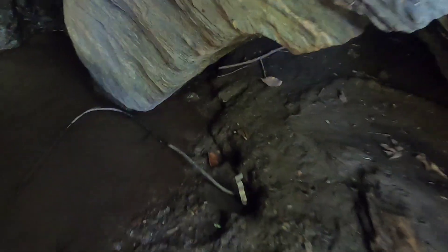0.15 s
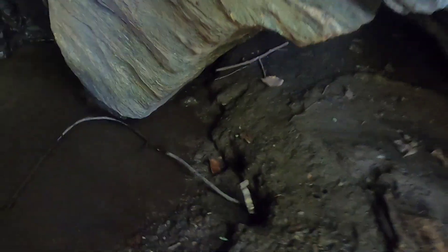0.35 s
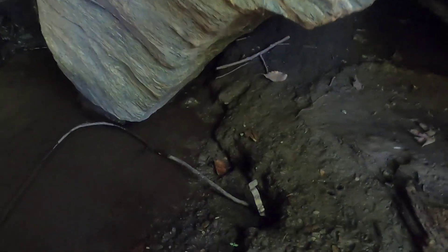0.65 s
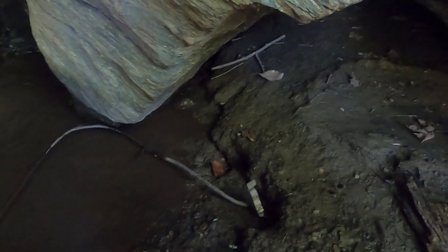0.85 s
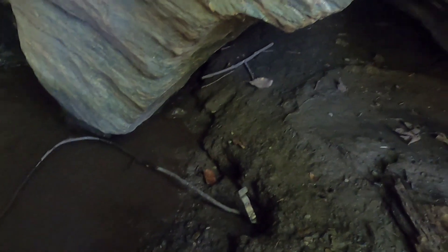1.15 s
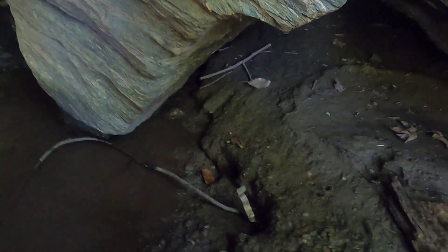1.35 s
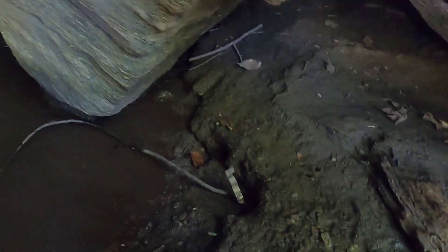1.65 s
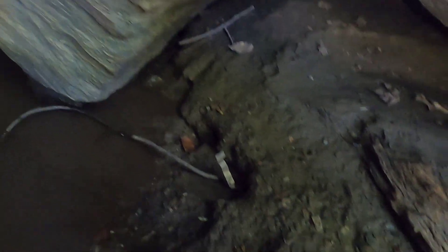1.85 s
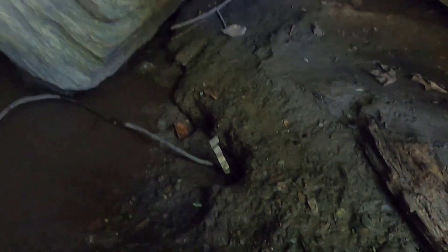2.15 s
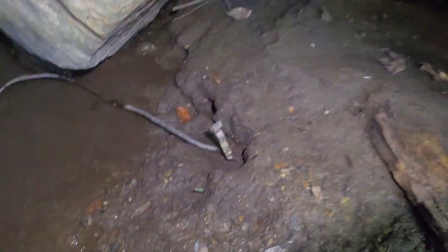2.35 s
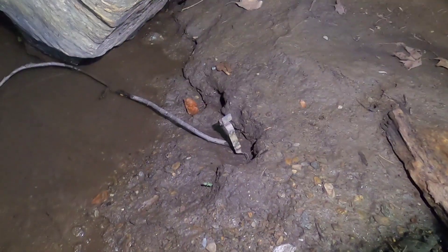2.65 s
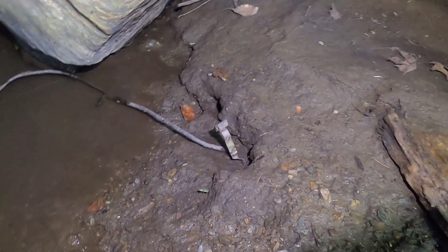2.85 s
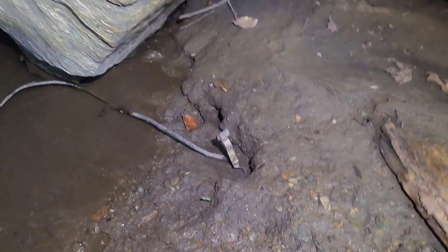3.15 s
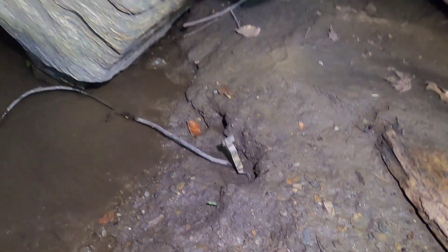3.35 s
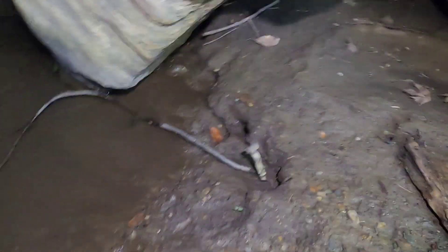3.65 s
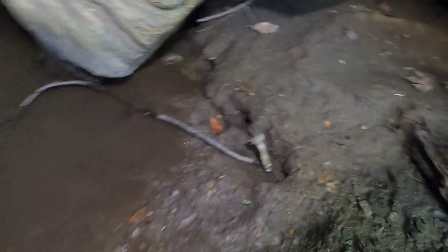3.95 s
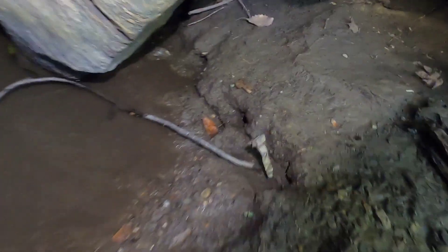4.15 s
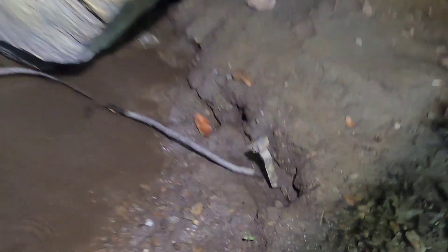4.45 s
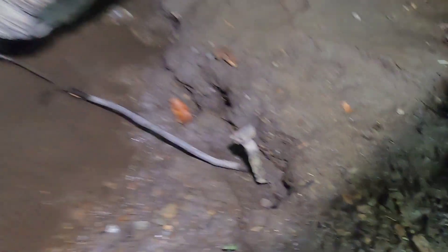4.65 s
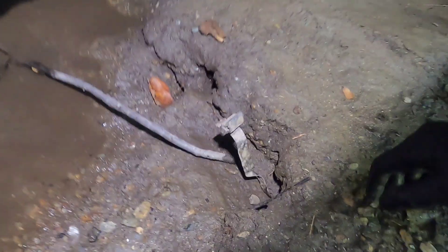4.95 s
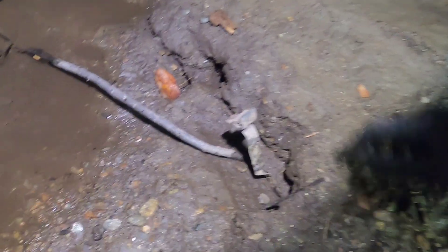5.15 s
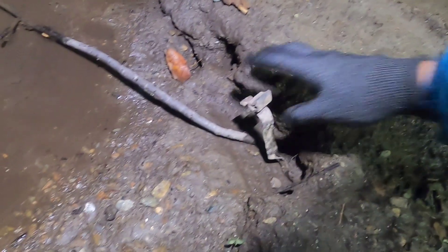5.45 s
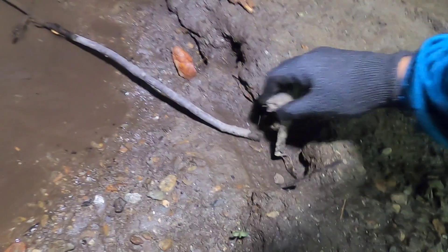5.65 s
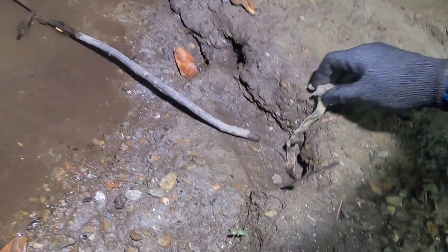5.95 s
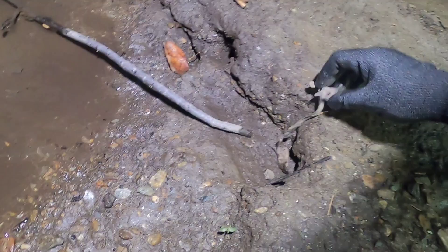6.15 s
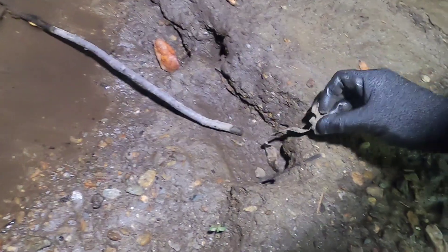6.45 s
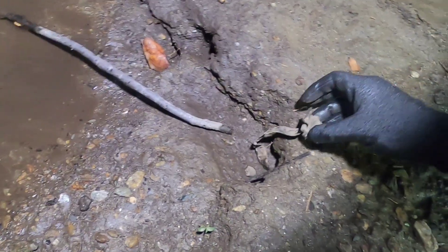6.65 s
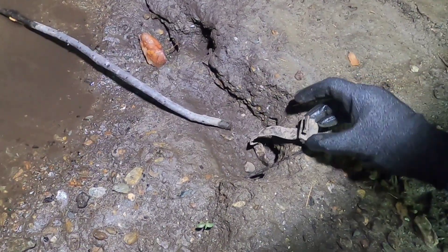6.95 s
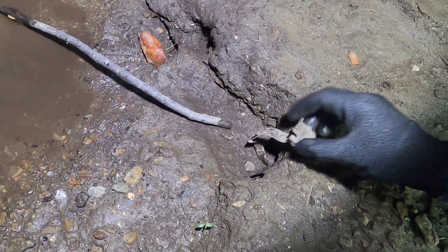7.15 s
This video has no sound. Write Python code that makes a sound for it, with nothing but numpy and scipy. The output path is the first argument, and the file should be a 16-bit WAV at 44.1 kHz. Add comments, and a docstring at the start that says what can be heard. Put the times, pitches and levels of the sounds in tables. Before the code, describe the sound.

Water rushes continuously in a low, rocky cave, a patchy hiss leaning left, with swarms of gurgling bubbles, fine spray, quick droplet ticks and a faint hum from hollows. At 0 s stones clatter hard underfoot, a sharp clack with a short ring; softer treads and hollow taps follow at about 0.2, 0.4 and 0.6 s, with a little crunching grit. From 0.7 to 3.6 s the stream dominates, with single rising plops, a faint tread near 1.5 s and small splashes near 1.4, 1.9 and 2.9 s. At 3.7 s a splash and deep camera bumps lead to a gravelly heel scuff at 3.9 s, then a second loud stone clatter at 4.0 s, trailing small clicks until 4.2 s. A low jolt and dull faint step follow by 4.7 s. Water carries on to 7.3 s, slightly softer and more central, with plops and light slaps around 6 s.

```python
"""A stream rushes to the left in a low rock cave: patchy hiss with bubble swarms, spray and humming hollows.
Droplets tick and single bubbles plop as short sines; splashes slap the rocks as bursts of filtered noise.
The person holding the camera shifts their footing on wet gravel: treads, hollow taps, a heel scuff and two
hard clatters of stones, at the start and near 4 s, made of pressed pebbles, clacks and ground resonances.
The hand-held camera rumbles as it moves: deep noise with a few jolts."""
import sys
import numpy as np
from scipy import signal
from scipy.fft import rfft, irfft, next_fast_len
from scipy.io import wavfile
from scipy.ndimage import uniform_filter1d, map_coordinates

SR = 44100
rng = np.random.default_rng(int(sys.argv[2]) if len(sys.argv) > 2 else 0)


def transcribe(u):
    """Save the signal u as a 16-bit wav file named by the first command-line argument.

    u: samples, shape (n,) or (channels, n), limited to [-1, 1]; the rate is SR.
    q: integer samples, one column per channel.
    """
    v = np.clip(np.atleast_2d(u).T, -1, 1)
    q = np.round(v * 32767).astype(np.int16)
    wavfile.write(sys.argv[1], SR, q)


N = 322371
TIME = np.arange(N) / SR

# Every balance is left minus right, in dB: positive leans left.
# where the stream lies as the camera turns: time_s, balance_db
STREAM_BALANCE = [(0, -3), (3.4, -1), (4.3, -2.5), (5.2, 0), (7.3, -0.5)]
# the stream grows fainter overall as the camera bends to the bank: time_s, base level_db
STREAM_LEVEL = [(0, -36.5), (.8, -37.5), (2.1, -37.5), (2.7, -38.5), (4.0, -37), (5.1, -39.5), (7.3, -39)]
# colour of the rush at the left ear, also weighting the bubbles by pitch: freq_hz, relative level_db
RUSH_COLOUR_LEFT = [(60, -23), (200, -12), (400, -16.5), (650, -9), (850, -9), (950, -6), (2200, 0),
                    (4200, 1), (6000, -4), (7400, -5), (8300, -17), (10000, -30), (15500, -50)]
# resonances of the stony ground under the boot: freq_hz, width_hz, relative level_db
GROUND_MODES = [(243, 26, -2.5), (341, 20, 0), (473, 20, -3.5), (585, 32, -0.5), (707, 33, -2),
                (1066, 65, -1), (1640, 40, -6)]
# colour of gravel scraping and cracking: freq_hz, relative level_db
SCRAPE_COLOUR = [(60, -14), (400, -16), (1300, -15), (4000, -22), (8000, -39), (15000, -60)]


def amp(db):
    """Decibels to gain."""
    return 10 ** (np.asarray(db) / 20)


def unit(x):
    """Scaled to rms 1."""
    return x / np.sqrt(np.mean(x ** 2) + 1e-20)


def fade(t, t60):
    """Exponential decay that falls 60 dB in t60 seconds."""
    return amp(-60 * t / t60)


def along(points, hz):
    """Curve of (freq_hz, value) points read on a log frequency axis."""
    f, v = np.transpose(points)
    return np.interp(np.log(hz + 1), np.log(f + 1), v)


def over_time(rows):
    """Curve of (time_s, value) points read at every sample."""
    s, v = np.transpose(rows)
    return np.interp(TIME, s, v)


def wobble(rate):
    """A smooth random curve with rate knots a second."""
    knots = rng.standard_normal(int(N * rate / SR) + 4)
    return map_coordinates(knots, [TIME * rate], mode="nearest")


def filtered(x, response):
    """x shaped by a complex response of frequency, with padding against wrap-around."""
    size = x.shape[-1]
    m = next_fast_len(size + 8192)
    return irfft(rfft(x, m) * response(np.fft.rfftfreq(m, 1 / SR)), m)[..., :size]


def resonances(modes, f):
    """Causal response of (freq_hz, width_hz, level_db) modes, with alternating signs."""
    total = 0
    for k, (centre, width, db) in enumerate(modes):
        mode = 1j * f * width / (centre * centre - f * f + 1j * f * width)
        total = total + (-1) ** k * amp(db) * mode
    return total


def panned(balance_db):
    """Left and right gains for a left-minus-right balance."""
    return amp(np.array([[.5], [-.5]]) * balance_db)


def add(track, s, sound):
    """Mix a stereo sound in at s seconds."""
    part = track[:, max(0, round(s * SR)):][:, :sound.shape[-1]]
    part += sound[..., :part.shape[-1]]


def diffuse(pair):
    """Two unrelated signals as the ears get them: alike in the bass, partly opposed in the top treble."""
    # freq_hz, left-right correlation
    likeness = [(130, 0.95), (300, 0.84), (700, 0.84), (1400, 0.67), (2600, 0.42), (4400, 0.24),
                (7000, 0.069), (12000, -0.27)]

    def mid_side(hz):
        turn = np.arccos(np.clip(along(likeness, hz), -1, 1)) / 2
        return np.array([np.cos(turn), np.sin(turn)])

    mid, side = filtered(pair, mid_side)
    return unit(np.array([mid + side, mid - side]))


def churn(patchy_db):
    """Stereo noise whose patches of pitch swell and sink, most around 1.3 kHz and in the high treble."""
    hz, _, z = signal.stft(rng.standard_normal((2, N)), SR, nperseg=512)
    field = uniform_filter1d(rng.standard_normal(z.shape[1:]), size=6, axis=0)
    field = uniform_filter1d(field, size=9, axis=1)
    depth = along([(200, 0.71), (1300, 1.0), (4000, 0.31), (9000, 0.95)], hz)[:, None]
    patches = z * amp(patchy_db * depth * unit(field))
    return diffuse(signal.istft(patches, nperseg=512)[1][:, :N])


def bubble(t, hz, cycles, glide):
    """A trapped air pocket rings for some cycles, its pitch rising as it nears the surface."""
    life = cycles / hz  # time to fall 60 dB
    tone = np.sin(2 * np.pi * hz * t * (1 + glide * np.minimum(t / life, 1)))
    return tone * fade(t, life) * (1 - np.exp(-t * hz / 2))


def babble(centre_hz, spread, cycles, scatter_db, count, size):
    """A swarm of small bubbles of random pitch, strength and place; the deep ones are faint."""
    chance = rng.random((count, 3))
    hz = np.clip(centre_hz * np.exp(spread * rng.standard_normal((count, 1))), 420, 7300)
    vigour = np.minimum(-np.log(chance[:, 1:2]), 2.5)
    strength = amp(scatter_db * vigour + along(RUSH_COLOUR_LEFT, hz))
    rings = strength * bubble(np.arange(size) / SR, hz, cycles, glide=0.084)
    at = (chance[:, :1] * N).astype(int) + np.arange(size)
    sides = panned(5 + 12 * (chance[:, 2] - .5))
    return unit(np.array([np.bincount(at.ravel(), (rings * g[:, None]).ravel(), N)[:N] for g in sides]))


def cave(x, wet_db):
    """The sound with the answer of the close rock walls: a short decaying noise tail."""
    # decay of the walls: freq_hz, t60_s
    wall_decay = [(130, 0.18), (1000, 0.37), (4000, 0.17), (12000, 0.091)]
    hz, t, z = signal.stft(rng.standard_normal((2, SR // 2)), SR, nperseg=256)
    tail = signal.istft(z * fade(t, along(wall_decay, hz)[:, None]), SR, nperseg=256)[1]
    tail = np.pad(tail / np.linalg.norm(tail[0]), ((0, 0), (180, 0)))  # about 4 ms before the answer
    return x + amp(wet_db) * signal.fftconvolve(x, tail, axes=1)[:, :N]


def handling():
    """The hand's tremor and a few jolts thrum through the camera body, more on the right."""
    # deep colour of the thrum: freq_hz, relative level_db
    thrum_colour = [(10, -28), (25, -1), (40, -1), (62, -13.5), (82, -14), (105, -15.5), (300, -28),
                    (1000, -64)]
    # jolts of the camera: middle_s, level_db, length_s
    jolt_rows = [(0.014, -52, .06), (.65, -61, 0.083), (2.57, -53, 0.063), (3.706, -48.5, 0.11),
                 (3.868, -44, 0.12), (4.044, -45, 0.23), (4.346, -44, 0.099), (4.6, -58, 0.59),
                 (6.95, -65, 0.6)]
    tremor_db, unsteady_db = -61.5, -1.2
    thrum = unit(filtered(churn(patchy_db=1.5), lambda hz: amp(along(thrum_colour, hz))))
    tremor = amp(tremor_db + unsteady_db * wobble(8))
    jolts = sum(amp(db) * np.exp(-(2 * (TIME - s) / length) ** 2) for s, db, length in jolt_rows)
    return (tremor + jolts) * thrum * panned(-4.5)


def hollows_hum():
    """Hollows in the rock keep ringing as the water's noise drives their resonances."""
    # hollows: freq_hz, width_hz, relative level_db
    hollow_modes = [(128.3, 14.8, 3), (181, 49, -7.5), (292, 45, -7), (545, 43, -5), (927, 33, -1.5),
                    (1293, 72, -2.5)]
    # time_s, level_db
    hum_level = [(0, -52.5), (1.6, -55), (2.25, -51), (2.7, -54.5), (5.2, -51.5), (5.55, -52), (6.1, -51.5),
                 (7.3, -50.5)]

    def response(hz):
        return resonances(hollow_modes, hz) * panned(along([(200, 2.0), (1000, 6.1)], hz))

    ringing = unit(filtered(churn(patchy_db=3), response))
    return amp(over_time(hum_level)) * ringing


def fine_spray(level_db):
    """Fine spray hisses in the treble, following the stream with a slow swelling and a flutter."""
    # freq_hz, relative level_db
    spray_colour = [(5000, -17), (9000, 1.5), (12300, -1.5), (13500, -7.5), (15600, -16)]
    under_stream_db, swell_db, flutter_db = -25, 0.5, 1.1
    mist = unit(filtered(churn(patchy_db=2.2), lambda hz: amp(along(spray_colour, hz))))
    spray_db = level_db + under_stream_db + swell_db * wobble(2.87) + flutter_db * wobble(26)
    return amp(spray_db) * mist * panned(1.4)


def stream():
    """Rushing water is patchy noise; trapped air adds swarms of deep, middle and bright bubbles."""
    # colour of the rush at the right ear: freq_hz, relative level_db
    colour_right = [(60, -25), (200, -13), (400, -18), (650, -13), (850, -19), (950, -8.5), (2200, -10),
                    (4200, -8), (7400, -8), (8200, -25), (10000, -33), (15500, -55)]
    level_db = over_time(STREAM_LEVEL) + 0.082 * wobble(8.2) + 0.33 * wobble(26)

    def ears(hz):
        return amp([along(RUSH_COLOUR_LEFT, hz), along(colour_right, hz)])

    rush = unit(filtered(churn(patchy_db=2.0), ears))
    glugs = babble(717, spread=0.25, cycles=68, scatter_db=-1.0, count=36, size=3500)
    gurgle = babble(1400, spread=0.4316, cycles=61, scatter_db=2.0, count=1300, size=2000)
    fizz = babble(3307, spread=0.392, cycles=17.0, scatter_db=5.5, count=3500, size=500)
    swarm = cave(amp(-26) * glugs + amp(-16.0) * gurgle + amp(-11.5) * fizz, wet_db=-0.5)
    water = amp(level_db) * (amp(1.5) * rush + swarm)
    return water * panned(over_time(STREAM_BALANCE)) + fine_spray(level_db) + hollows_hum()


def trickle():
    """Droplets tick on the near rock, a few cycles each, in quick surges."""
    under_stream_db, surge_db, surge_knots_per_s = -11, 4.5, 19
    drops = babble(2760, spread=0.508, cycles=10, scatter_db=6.5, count=5000, size=400)
    surges = unit(drops * amp(surge_db * wobble(surge_knots_per_s)))
    return amp(over_time(STREAM_LEVEL) + under_stream_db) * surges * panned(over_time(STREAM_BALANCE))


def plops():
    """Large bubbles close by ring singly, each a decaying sine with a slight upward glide."""
    # start_s, pitch_hz, level_db (before the common trim)
    bubble_rows = [(.09, 1380, -28), (.132, 697, -38), (.155, 692, -33), (.571, 1540, -22.5),
                   (.625, 1070, -31), (.757, 5100, -22), (.868, 1305, -26.5), (.914, 2720, -25),
                   (1.022, 780, -38), (1.256, 861, -34.5), (1.294, 1690, -27), (1.398, 1044, -30),
                   (1.505, 1790, -24), (1.633, 863, -32.5), (1.8, 1510, -27), (1.976, 775, -36),
                   (2.058, 1600, -28), (2.075, 1720, -35), (2.273, 2100, -26), (2.298, 1730, -26.5),
                   (2.325, 2000, -29), (2.41, 2020, -23.5), (2.43, 1920, -32), (2.495, 930, -33),
                   (2.828, 2150, -26.5), (2.832, 892, -29), (2.913, 1800, -25), (3.063, 1520, -30),
                   (3.319, 1510, -33), (3.359, 855, -36), (3.38, 1230, -29), (3.51, 884, -36),
                   (4.296, 1055, -29.5), (4.348, 2820, -25.5), (4.37, 1370, -31), (4.537, 1830, -31),
                   (4.654, 816, -37), (4.783, 534, -36.5), (4.87, 1050, -31), (4.947, 1286, -24),
                   (5.125, 1290, -31), (5.288, 748, -35.5), (5.373, 1355, -29), (5.713, 742, -35),
                   (5.71, 1310, -32), (5.728, 950, -35), (5.743, 1350, -30), (5.857, 2380, -24.5),
                   (5.925, 2090, -24.5), (5.935, 1120, -33), (5.977, 970, -36), (5.983, 2130, -23.5),
                   (6, 1400, -32), (6.18, 2150, -28), (6.21, 1290, -31), (6.237, 1930, -32),
                   (6.449, 900, -34), (6.598, 1290, -29.5), (6.787, 3030, -27), (6.911, 1275, -31),
                   (6.913, 880, -33), (7.1, 2400, -30), (7.124, 2670, -27), (7.163, 2670, -29),
                   (7.21, 1580, -28)]
    trim_db = -1.5
    out, t = np.zeros((2, N)), np.arange(SR // 8) / SR
    for s, hz, db in bubble_rows:
        add(out, s, amp(db + trim_db) * bubble(t, hz, cycles=47.5, glide=0.036) * panned(7.2))
    return cave(out, wet_db=-7.0)


def splashes():
    """Wavelets slap the rock: short bursts of noise in a band about an octave wide."""
    # start_s, level_db (before rise and decay), centre_hz, rise_s
    splash_rows = [(.045, -42, 1800, .02), (.392, -46, 2300, .008), (.538, -35.5, 2000, 0.0063),
                   (1.384, -36.5, 3500, .008), (1.925, -38.5, 2900, .053), (2.755, -36.5, 3400, .003),
                   (2.908, -34, 1590, .0071), (2.91, -36, 2400, .006), (3.694, -35.5, 5070, 0.0072),
                   (3.699, -36.5, 2270, .0056), (5.88, -39.5, 1410, 0.044), (5.975, -37.5, 1240, 0.0051),
                   (6.171, -46, 1910, .008), (6.423, -40, 5600, .004), (6.784, -41, 3200, .004)]
    t60_s = 0.14
    out, t = np.zeros((2, N)), np.arange(SR // 3) / SR
    for s, db, centre_hz, rise in splash_rows:
        noise = diffuse(rng.standard_normal((2, len(t))))
        burst = filtered(noise, lambda hz: np.exp(-(np.log2((hz + 1) / centre_hz) / 0.5) ** 2))
        envelope = np.minimum(t / rise, 1) * fade(np.maximum(t - rise, 0), t60_s)
        add(out, s, amp(db) * unit(burst) * envelope * panned(5.2))
    return cave(out, wet_db=-12)


def grit():
    """Sand grains snap under the boot: sparse random clicks in brief, bright crunches."""
    # start_s, level_db, length_s
    crunch_rows = [(0.363, -53, 0.041), (2.04, -63, .1), (3.695, -61, .02), (3.85, -60, .05),
                   (4.03, -57, .04), (5.09, -58, .025), (6.425, -64, .02)]
    colour = [(1000, -20), (5000, 2), (12000, 5), (15500, -17)]  # freq_hz, relative level_db
    press = sum(amp(db) * np.exp(-(2 * (TIME - s) / length - 1) ** 2) for s, db, length in crunch_rows)
    snaps = rng.standard_normal((2, N)) * (rng.random(N) < .04)
    return press * unit(filtered(snaps, lambda hz: amp(along(colour, hz))))


def scuff():
    """The heel drags over gravel in uneven slips: first a rasp, then its hollow rings."""
    # the hollow heel: freq_hz, width_hz, relative level_db
    heel_modes = [(84, 26, -3), (238, 35, -6.5), (347, 22, 3), (633, 45, -14), (950, 60, -16)]
    middle_s, length_s, level_db = 3.872, 0.054, -32
    rasp_lead_s = 0.012  # the gravel rasps before the heel takes the weight
    slips = rng.standard_normal(N) * (rng.random(N) < .04)

    def press(s):
        return np.exp(-(2 * (TIME - s) / length_s) ** 2)

    hollow = unit(filtered(slips, lambda hz: resonances(heel_modes, hz))) * press(middle_s)
    rasp = unit(filtered(slips, lambda hz: amp(along(SCRAPE_COLOUR, hz)))) * press(middle_s - rasp_lead_s)
    return cave(amp(level_db) * (hollow + amp(-4.5) * rasp) * panned(-6), wet_db=-20)


def crush(rise, low_hz, high_hz):
    """A cluster of pebbles is pressed, held and released: it rattles against the sole and rings the ground."""
    # colour of the sole: freq_hz, relative level_db
    sole_colour = [(30, -13), (85, 2), (170, 2.5), (240, -0.5), (700, -10), (1400, -1.5), (2600, -2),
                   (5000, -3), (7500, -7), (9000, -28), (15500, -47)]
    t60_s = 0.12
    t = np.arange(SR // 3) / SR
    pebbles = rng.choice([-1, 1], len(t)) * (rng.random(len(t)) < .15)
    rattle = unit(pebbles) + 0.23 * rng.standard_normal((2, len(t)))
    # the weight stays on for a moment, longer after a slow landing
    release = rise + 0.0072 + 0.63 * rise
    push = np.minimum(t / rise, 1) * fade(np.maximum(t - release, 0), t60_s)

    def response(hz):
        ring = sum(resonances([mode], hz) for mode in GROUND_MODES)
        reach = 1 / np.sqrt((1 + (hz / high_hz) ** 4) * (1 + (low_hz / (hz + 1)) ** 4))
        return (amp(along(sole_colour, hz)) + 1.2 * ring) * reach

    tread = unit(filtered(rattle * push, response))
    return tread * np.sqrt(np.mean(push ** 2))


def steps():
    """The boot lands, then slides with a weaker scrape, mostly brighter; each tread has its own brightness."""
    # start_s, level_db (before the push envelope), rise_s, low_hz (low = deep),
    # high_hz (low = dull), balance_db
    step_rows = [(0, -27.5, 0.0013, 260, 1170, 0.5), (.179, -41.5, 0.0022, 330, 1500, -1),
                 (.374, -43, 0.0039, 280, 1600, 1), (.54, -48, 0.0025, 300, 480, 1),
                 (.61, -42, 0.0031, 280, 440, 0), (1.541, -41.5, 0.0032, 500, 1500, 2),
                 (4.016, -27.5, 0.0032, 170, 1500, 2), (4.03, -31.5, .006, 190, 2900, 1),
                 (4.653, -47, 0.0024, 257, 800, -18)]
    slide_delay_s, slide_rise_s, slide_db = 0.0091, 0.0068, -6
    slide_low_hz, slide_high_hz = 900, 4570
    out = np.zeros((2, N))
    for s, db, rise, low_hz, high_hz, side_db in step_rows:
        weight = amp(db) * panned(side_db)
        add(out, s, weight * crush(rise, low_hz, high_hz))
        slide = crush(slide_rise_s, slide_low_hz, slide_high_hz)
        add(out, s + slide_delay_s, weight * amp(slide_db) * slide)
    return cave(out, wet_db=-16.5)


def knocks():
    """A stone strikes its neighbour: a crack, a sharp clack of a few cycles, and the ground rings after it."""
    # stones under the boot: start_s, level_db, clack pitch_hz (large stone = low),
    # ground ring_db relative to the clack, balance_db
    knock_rows = [(.0119, -8, 1330, -30, -5), (.0156, -12, 900, -37, 3), (.0186, -14, 1300, -38, 0),
                  (.025, -19, 1150, -34, 0), (.0355, -17, 3000, -42, 0), (.1812, -19, 1210, -30, -3),
                  (.184, -25.5, 1000, -26, -1), (.189, -19, 1400, -37, -1), (.1905, -24, 620, -26, -1),
                  (.376, -20, 1250, -33, 1), (.3775, -19, 3500, -36, 1), (.531, -23.5, 420, -28, -1),
                  (.574, -30, 350, -30, 0), (.595, -23, 457, -25, 1), (.645, -28, 370, -29, 1),
                  (3.842, -20, 680, -32, -2), (3.851, -21, 1200, -34, -2), (3.859, -25, 450, -30, -2),
                  (3.863, -22, 1000, -32, -2), (3.876, -20, 346, -36, -2), (3.8855, -20.5, 335, -36, 5),
                  (3.896, -30, 330, -36, -2), (3.983, -22.5, 700, -20, 1), (4.0144, -9, 1260, -23.5, 0),
                  (4.0208, -13, 2300, -43, 0), (4.0218, -10.5, 666, -18.5, -3), (4.0236, -19, 1500, -39, 0),
                  (4.028, -13.5, 900, -21, -1), (4.0335, -22, 1900, -42, 0), (4.0378, -14.5, 1690, -32, 3),
                  (4.041, -25, 990, -30, 0), (4.0448, -22, 2600, -36, 0), (4.051, -17, 3200, -36, 0),
                  (4.06, -23, 2300, -36, 1), (4.078, -23, 1200, -38, 0), (4.183, -26, 850, -36, 0),
                  (4.203, -25.5, 800, -34, 0)]
    clack_cycles, clack_rise_cycles = 7.8, 0.63
    crack_db, crack_t60_s, edge_rise_s = -12.5, 0.0067, 0.00056
    mute_s = 0.055  # the settling boot damps the ringing ground
    out, t = np.zeros((2, N)), np.arange(SR // 5) / SR
    edge = np.sin(np.pi / 2 * np.minimum(t / edge_rise_s, 1)) ** 2
    for s, db, hz, ring_db, side_db in knock_rows:
        onset = 1 - np.exp(-t * hz / clack_rise_cycles)
        clack = np.sin(2 * np.pi * hz * t) * fade(t, clack_cycles / hz) * onset
        noise = rng.standard_normal(len(t))
        crack = unit(filtered(noise, lambda f: amp(along(SCRAPE_COLOUR, f)))) * fade(t, crack_t60_s)
        ring = 0
        for f, width, mode_db in GROUND_MODES:
            tone = np.sin(2 * np.pi * (f * t + rng.random())) * np.exp(-np.pi * width * t)
            ring = ring + amp(mode_db + rng.normal(0, 2.0)) * tone
        body = amp(crack_db) * crack + amp(ring_db) * ring * np.exp(-(t / mute_s) ** 2)
        add(out, s, amp(db) * (clack + edge * body) * panned(side_db))
    return cave(out, wet_db=-17.5)


def scene():
    """Camera, water and feet together."""
    water = stream() + trickle() + plops() + splashes()
    feet = grit() + scuff() + steps() + knocks()
    return handling() + water + feet


def record(dry):
    """The camera keeps nothing above its band limit of 15680 Hz."""
    return filtered(dry, lambda hz: hz < 15680)


dry = scene()
out = record(dry)
transcribe(out)
```